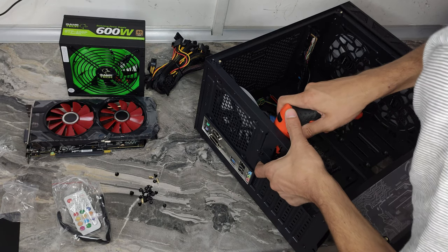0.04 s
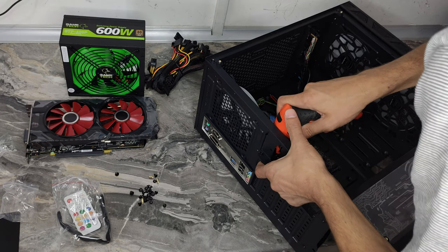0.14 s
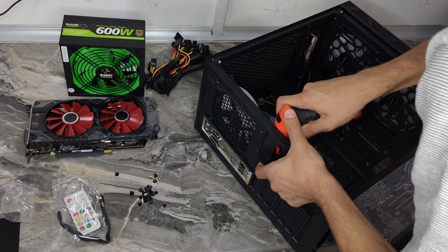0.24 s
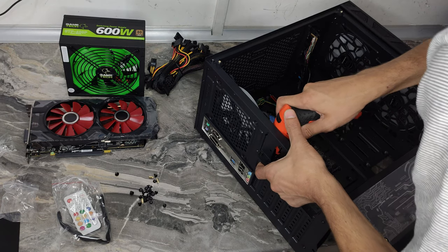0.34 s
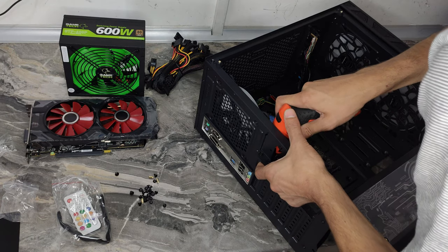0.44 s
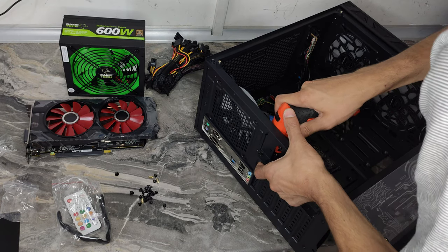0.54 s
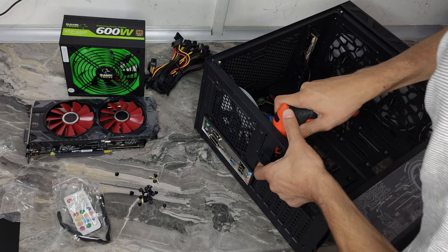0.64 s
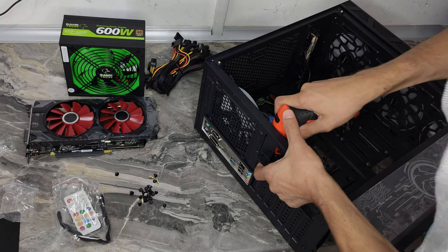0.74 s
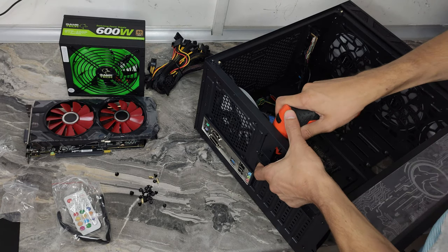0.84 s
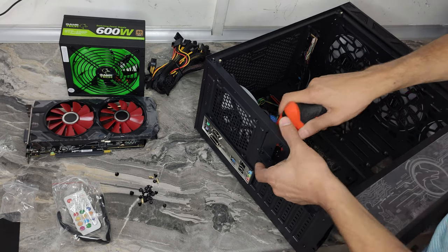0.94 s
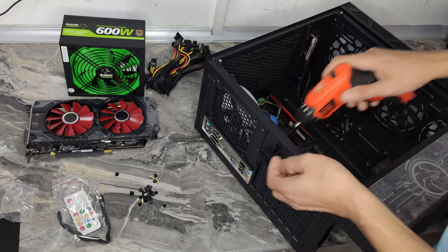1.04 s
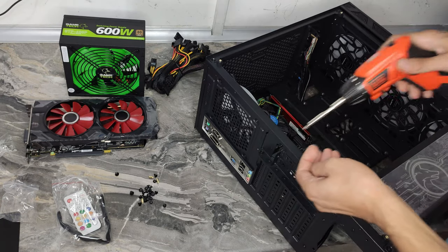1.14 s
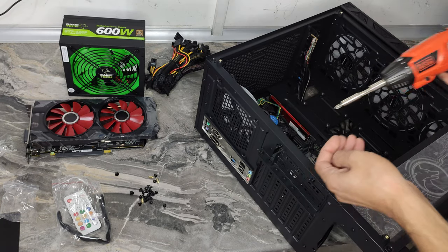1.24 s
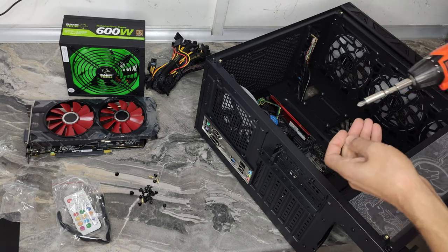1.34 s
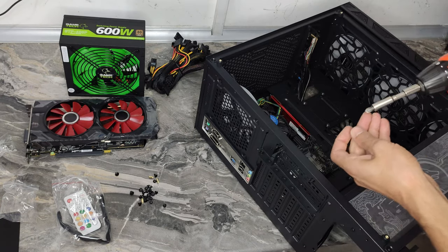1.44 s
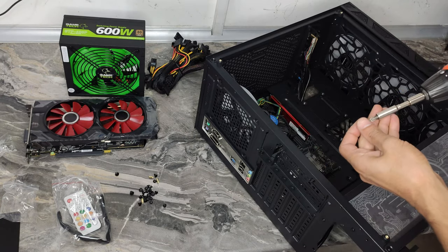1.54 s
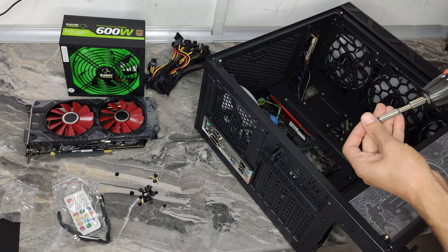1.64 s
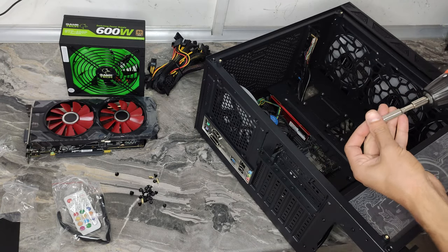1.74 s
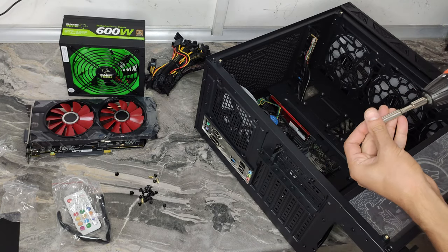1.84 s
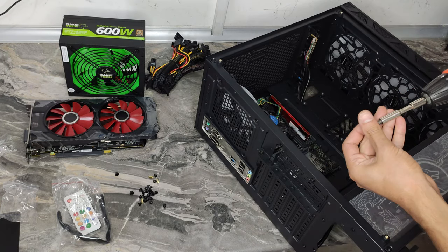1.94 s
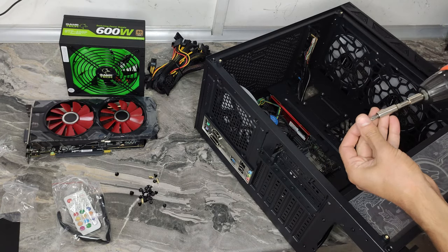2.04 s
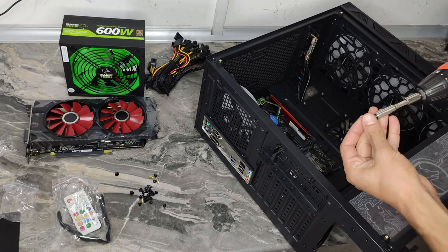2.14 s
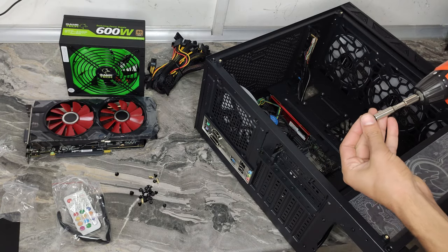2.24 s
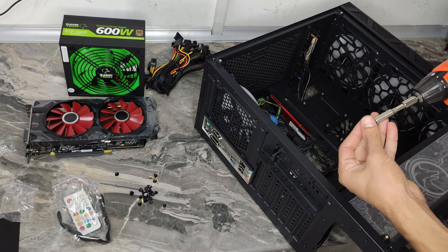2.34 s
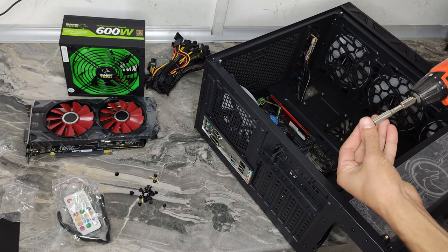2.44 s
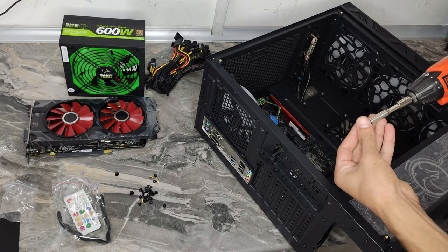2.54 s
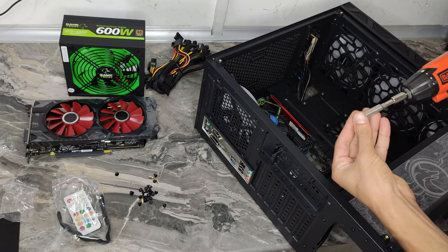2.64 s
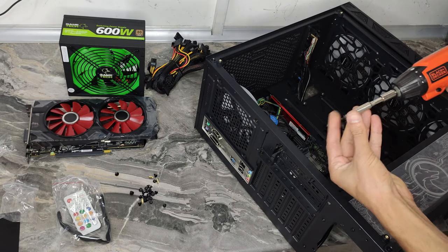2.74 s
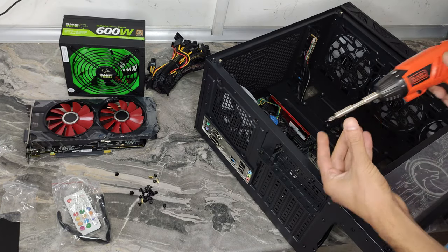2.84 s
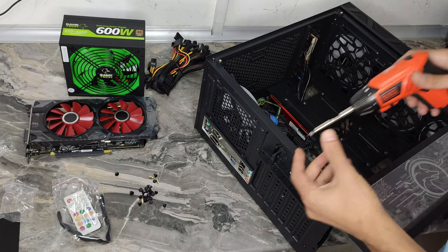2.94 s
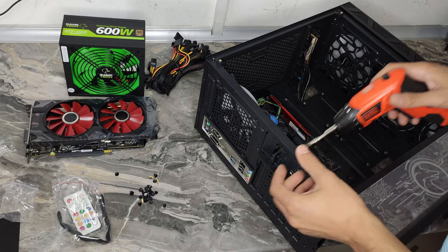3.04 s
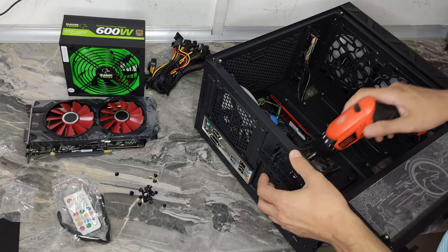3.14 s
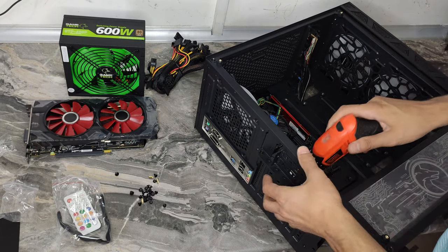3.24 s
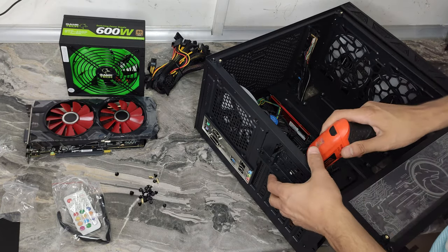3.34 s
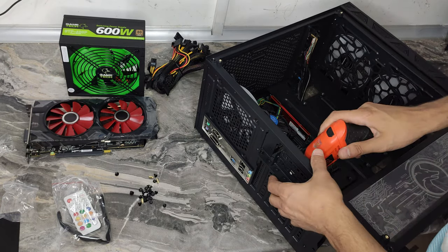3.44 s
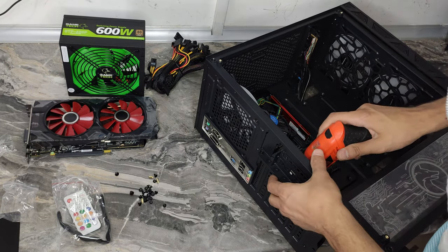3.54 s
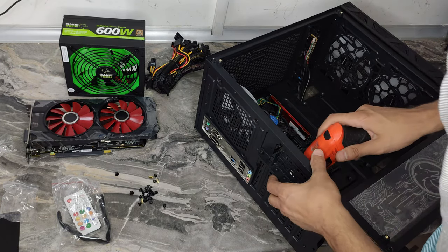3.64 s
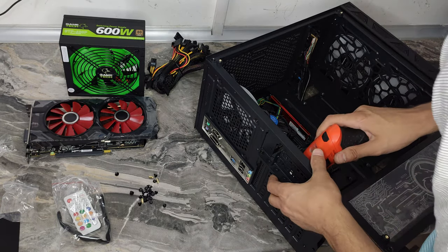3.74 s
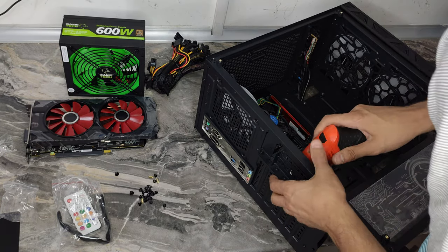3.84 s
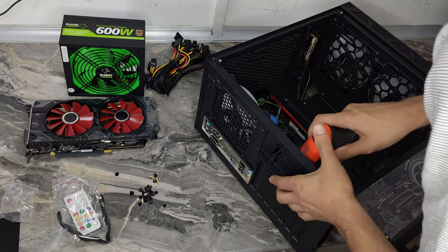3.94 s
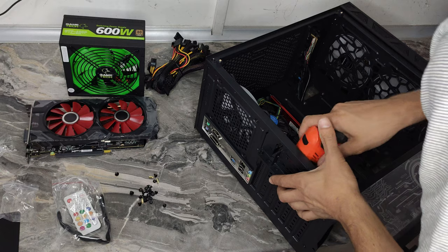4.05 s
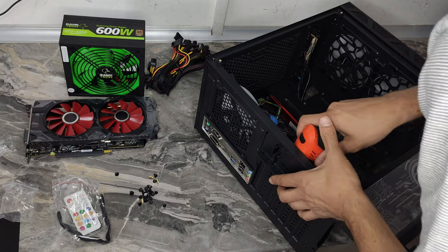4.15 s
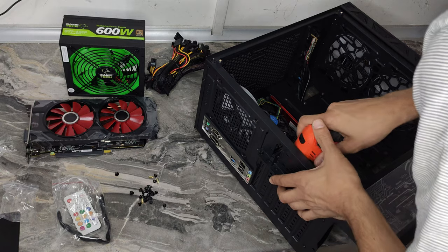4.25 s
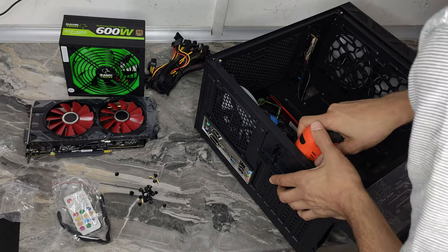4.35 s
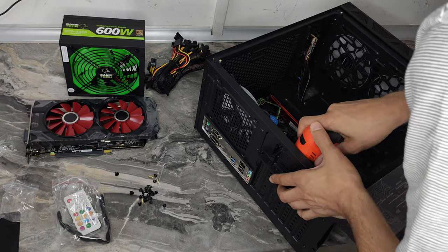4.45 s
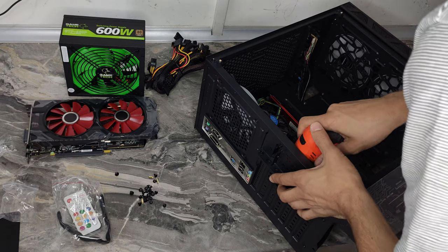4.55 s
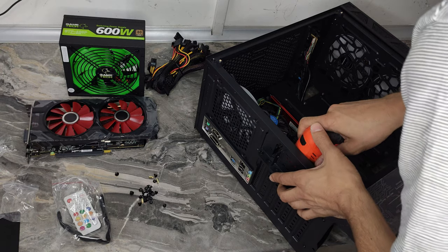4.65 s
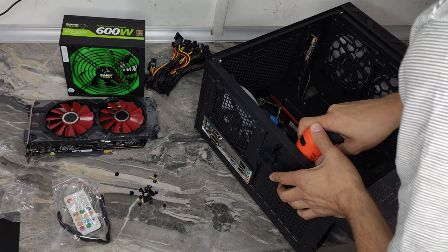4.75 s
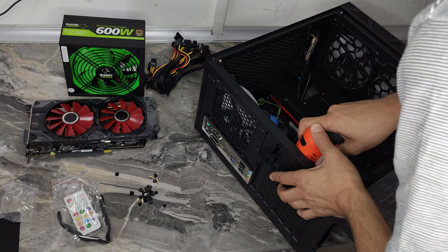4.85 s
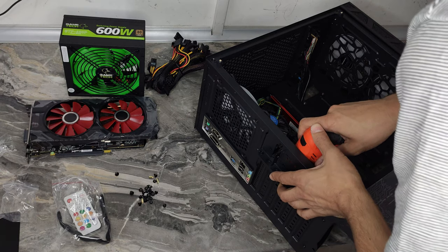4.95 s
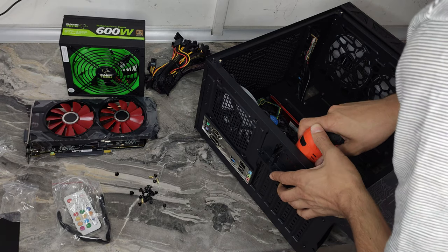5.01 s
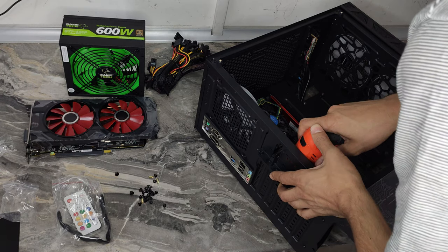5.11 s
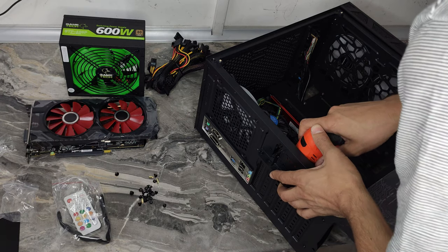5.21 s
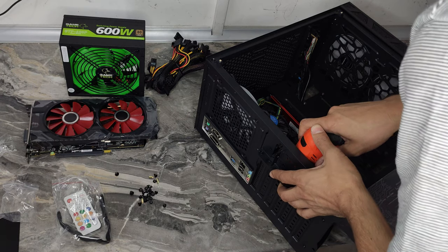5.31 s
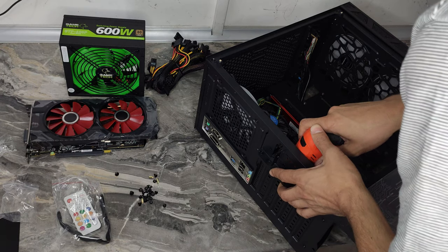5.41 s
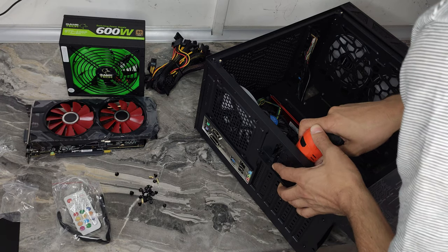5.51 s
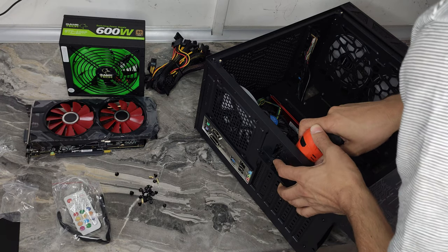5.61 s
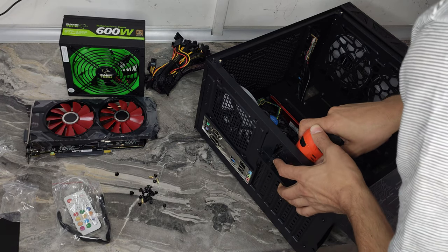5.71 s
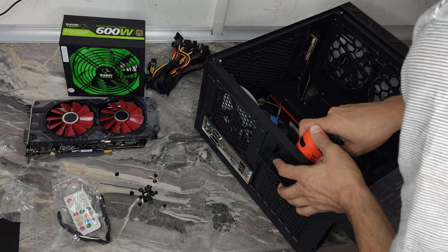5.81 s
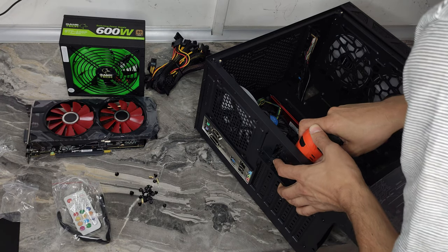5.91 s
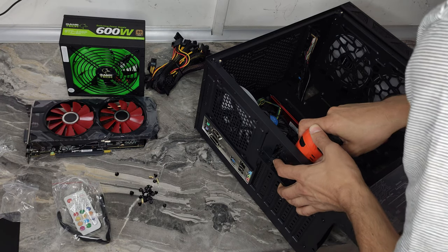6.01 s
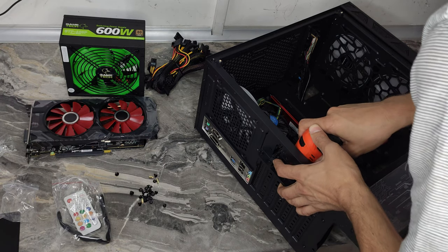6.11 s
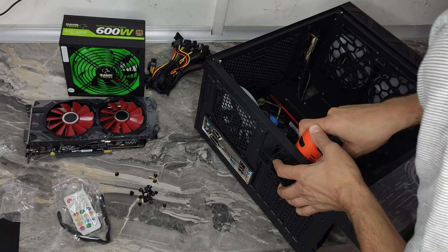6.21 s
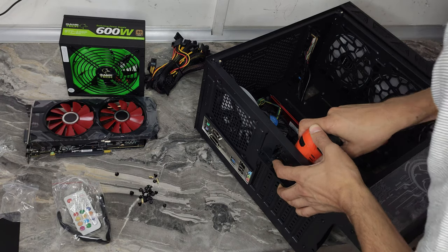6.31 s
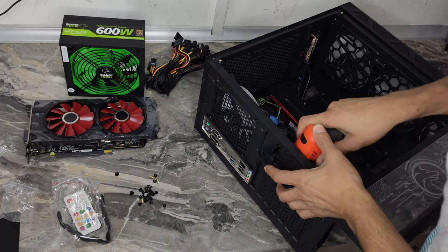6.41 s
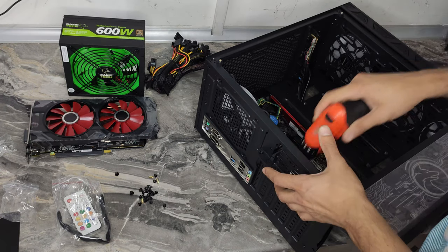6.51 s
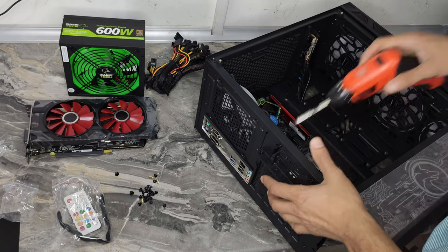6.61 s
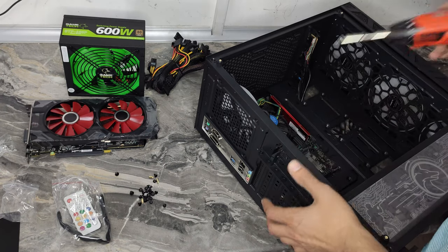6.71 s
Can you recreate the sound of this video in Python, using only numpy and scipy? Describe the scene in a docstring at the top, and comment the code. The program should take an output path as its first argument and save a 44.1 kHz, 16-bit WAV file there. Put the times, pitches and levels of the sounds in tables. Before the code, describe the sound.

A small cordless screwdriver is already running, its gears rattling and whining as it drives a screw into a steel computer case. From about 0.4 seconds it slows and groans under load, and the clutch clacks five times. At 1 second it stops with a knock that booms in the panels, and the motor briefly runs down. Faint ticks follow until about 3 seconds, the later ones from a screw touching the bit, then comes a soft shift of the plastic grip. Around 3.7 seconds the screw taps lightly around its hole. At 4.2 seconds the bit catches with a sharp click and the driver whirs again, growing louder. Near 5.9 seconds its pitch sinks under strain, the clutch ratchets from 6.1 to 6.4, and it stops with a softer knock at 6.5 seconds. The room is bare and slightly echoing, with a faint steady hush.

```python
"""Cordless screwdriver on a steel computer case.

A small driver sets two screws in a bare, echoing room. Its gears rattle, whine and slow under load,
the clutch ratchets, and the spindle locks with a knock that booms in the case panels. In between come
faint ticks as the motor runs down, then the next screw ticks on the bit and is tapped into its hole."""
import sys
import numpy as np
from scipy import signal
from scipy.fft import rfft, irfft
from scipy.io import wavfile
from scipy.ndimage import uniform_filter1d

SR = 44100
rng = np.random.default_rng(int(sys.argv[2]) if len(sys.argv) > 2 else 0)


def to_wav(sig):
    """Store sig (one row per channel, or 1-D mono) as 16-bit WAV at the path in sys.argv[1].

    Samples outside -1..1 are clipped; the rate is SR.
    """
    pcm = np.clip(np.atleast_2d(sig), -1, 1) * 32767
    pcm = np.round(pcm).astype(np.int16)
    wavfile.write(sys.argv[1], SR, pcm.T)  # frames by channels


N = 298557
TIME = np.arange(N) / SR

# one run per screw (trigger on [s], head touches [s], trigger off [s], gear noise [dB],
# rise under load [dB], bass re gear noise [dB], bass change at full load [dB], run-down [s])
MOTOR_RUNS = [(-1.0, .40, .945, -21, 4.5, -1.8, -1.2, .42), (4.18, 5.915, 6.449, -21, 4.5, -1.4, -2.2, .31)]
# gear rattle spectrum (frequency [Hz], density [dB])
GEAR_COLOUR = [(59, -71), (100, -32), (201, -24), (238, -19.5), (438, -7.5), (519, -12.5), (668, -3.5),
               (998, -11.5), (1370, -4.5), (2100, -4), (2930, -3.6), (4660, -12), (7250, -16),
               (14500, -31.5), (15500, -43)]
# resonances of the tool pressed on the case (frequency [Hz], width [Hz], lift [dB])
HOUSING_PEAKS = [(310, 144, 4.5), (445, 30, 7), (705, 58, 1.5), (785, 33, 4.5), (882.6, 13, 7),
                 (923, 72, 8), (1033, 27, 7.5), (1108, 29, 5), (1370, 32, 2), (2500, 97, -3.5),
                 (3350, 400, 2), (4040, 420, 3), (6780, 1400, 4), (11000, 900, 1.5)]
# hum and gear whine, one list per run (frequency at free speed [Hz], level re gear noise [dB])
WHINE_PARTIALS = [
    [(445, -15), (662, -15), (856, -11), (1160, -12.5), (1384, -9.5), (1480, -13), (2213, -18),
     (2649, -10.5), (3305, -18), (3693, -18)],
    [(210, -22), (648, -13.5), (700, -16), (788, -19), (942, -18), (1133, -11), (1338, -11.5), (1508, -18),
     (1889, -17), (2266, -16), (2864, -14), (3063, -11), (3385, -21)],
]
# gear mesh groan, sinking as each head seats (time [s], pitch [Hz], level re gear noise [dB])
GROAN_CURVE = [(0, 2700, -14), (.3, 2680, -16), (.40, 2350, -16), (.45, 2020, -11), (.50, 1800, -9),
               (.55, 1700, -9), (.60, 1400, -14), (.67, 1800, -11), (.72, 1620, -13), (.78, 1780, -10),
               (.86, 1300, -12), (.95, 1400, -14), (4.2, 2900, -19), (5.88, 2850, -17), (5.94, 2600, -12),
               (5.99, 2250, -10.5), (6.03, 2130, -9), (6.065, 1880, -6.5), (6.10, 1650, -7),
               (6.13, 1480, -7), (6.16, 1300, -9), (6.25, 1230, -12), (6.45, 1300, -18)]
# lower drone under full load (time [s], pitch [Hz], level re gear noise [dB])
DRONE_CURVE = [(.4, 900, -35), (.5, 880, -15), (.60, 820, -15), (.65, 790, -7), (.70, 830, -10),
               (.76, 830, -6.5), (.83, 880, -15), (.95, 900, -16), (4.2, 900, -45), (5.9, 880, -35),
               (5.98, 900, -11), (6.09, 940, -9), (6.18, 980, -12), (6.23, 920, -7), (6.30, 950, -7.5),
               (6.36, 780, -11), (6.45, 740, -14)]
# clutch slipping one notch (time [s], level [dB], decay [s], case jolt [dB], gear falter [dB])
CLUTCH_NOTCHES = [(0.603, -10, .008, -2, -4), (.717, -9, 0.008, -2, -7), (.785, -4.5, 0.008, -12, 0),
                  (0.854, -6.5, 0.006, -34, -4), (.924, -5, 0.005, -32, -5), (6.1425, -2, 0.007, -12, 0),
                  (6.213, -6, .012, -16, -3), (6.276, -7, .014, -18, -2), (6.344, -8, 0.012, -20, -3),
                  (6.417, -5.5, 0.005, -21, -3)]
# bit snapping against the screw's slots (time [s], level [dB], decay [s])
BIT_SLIPS = [(.629, -10, .007), (.648, -11, .006), (6.030, -11, .003), (6.058, -8.5, .003),
             (6.128, -9, .011), (6.361, -7, .004)]
# clutch and bit clack spectrum (frequency [Hz], density [dB])
RATCHET_COLOUR = [(100, -36), (400, -12), (800, -3), (1300, -.5), (2500, 0), (3600, -5), (5000, -8.5),
                  (7200, -8), (8500, -17.5), (15000, -36)]
# spectrum of clutch jolts in the case (frequency [Hz], density [dB])
CASE_JOLT_COLOUR = [(50, -46), (130, -15), (250, -8), (380, 0.5), (520, -9.5), (750, 2.5), (1100, -14),
                    (1800, -12), (5000, -41)]
# motor brush spectrum (frequency [Hz], density [dB])
COAST_COLOUR = [(200, -18), (1200, 0.5), (3300, -3), (5000, -7), (7000, -4), (8200, -15.5), (15000, -26.5)]
# spindle locking (time [s], level [dB], decay [s])
SPINDLE_LOCKS = [(0.989, -1.5, 0.012), (1.001, -5, 0.014), (6.472, -8.5, 0.012), (6.481, -8, 0.016)]
# lock thud spectrum (frequency [Hz], density [dB])
LOCK_COLOUR = [(35, -38), (65, -19), (100, -24), (150, -8.5), (230, -5.5), (300, -7), (405, 4), (520, -7),
               (720, -6), (1000, -8.5), (1400, -19), (2500, -24), (5500, -66)]
# steel panel modes (frequency [Hz], level [dB], T60 [s])
PANEL_MODES = [(155, -1, 0.2), (257, -12, 0.5), (344.5, 2, 0.14), (523, -14, 0.45), (654, -12, 0.37),
               (746, 6, 0.12), (1015, -9, 0.36), (1143, -19, .8), (1310, -18, 0.53), (1360, -8, 0.36)]
# faint ticks as the motor runs down, then the screw ticking on the bit
# (time [s], level [dB], decay [s], cut-off [Hz])
LIGHT_TICKS = [(1.257, -37, .003, 12900), (1.279, -35, .003, 13000), (1.719, -35, .003, 7000),
               (1.726, -27, 0.0035, 6000), (1.902, -22.5, 0.0035, 1900), (2.239, -30.5, 0.004, 9000),
               (2.288, -20, 0.007, 8500), (2.8125, -20.5, 0.0045, 7000), (4.016, -35, 0.003, 13000)]
# tick spectrum (frequency [Hz], density [dB])
LIGHT_TICK_COLOUR = [(300, -30), (700, -2), (1000, 1), (1350, 1), (2000, -5.5), (3000, -11.5), (4500, -13),
                     (6800, -14.5), (9000, -26), (15000, -28)]
# metallic ring of the ticks (frequency [Hz], width [Hz], lift [dB])
TICK_PEAKS = [(1200, 200, 5), (1405, 60, 6), (1650, 70, 1), (1860, 70, 2), (2085, 70, 5), (2370, 140, 3),
              (3020, 100, 4), (3330, 220, 2)]
# plastic grip shifting (time [s], level [dB], decay [s])
GRIP_SHIFTS = [(2.938, -41, 0.014), (2.953, -26.5, .006)]
# grip spectrum (frequency [Hz], density [dB])
PLASTIC_COLOUR = [(100, -27), (300, -10), (420, -6), (505, 1), (620, -12), (1000, -21), (4000, -52),
                  (12000, -55)]
# screw tapping round its hole (time [s], level [dB], decay [s], cut-off [Hz])
RIM_TAPS = [(3.643, -28, 0.012, 14000), (3.650, -21, .008, 3000), (3.661, -16.5, 0.007, 3200),
            (3.690, -30, 0.012, 3000), (3.722, -24.5, 0.016, 14000), (3.749, -23, 0.013, 5000),
            (3.803, -25, 0.012, 4000), (3.824, -25.5, 0.016, 9000), (3.856, -33, .012, 7000)]
# tap spectrum (frequency [Hz], density [dB])
RIM_COLOUR = [(50, -31), (90, -14), (170, -11), (260, -14), (380, 4), (560, -11.5), (800, -3.5),
              (1000, -10.5), (1400, -9.5), (2000, -16.5), (2600, -15), (3300, -15.5), (5000, -25),
              (7500, -22), (15000, -52)]
# panel resonances round the hole (frequency [Hz], width [Hz], lift [dB])
HOLE_PEAKS = [(382, 60, -3), (673, 50, 5.5), (817, 50, 4.5), (1370, 140, 9.5), (1580, 90, 6)]
# bit jumping into the screw head (time [s], level [dB], decay [s])
BIT_CATCHES = [(4.105, -44, 0.048), (4.140, -23, 0.025), (4.150, -14.5, 0.025), (4.166, -3.5, 0.013),
               (4.178, -7.5, 0.018)]
# catch spectrum (frequency [Hz], density [dB])
BIT_COLOUR = [(47, -45), (80, -20), (234, -21), (363, -10), (526, -11), (1040, -2.5), (1290, -16),
              (1380, -2.5), (1470, -21), (1570, -13), (3240, -14.5), (8300, -26.5), (15000, -51)]
# ring of the bit and the panel under it (frequency [Hz], width [Hz], lift [dB])
BIT_PEAKS = [(855, 23, 5.5), (940, 25, -10), (1032, 32, 4), (1210, 25, 6), (1540, 28, 13), (1860, 40, 7),
             (8100, 120, -1)]
# room hush spectrum (frequency [Hz], density [dB])
HUSH_COLOUR = [(12, -26), (20, 0), (38, -6), (59, -12), (157, -22), (180, -14.5), (259, -12), (352, -12),
               (393, -10), (505, -13), (958, -14.5), (1130, -19.5), (1980, -22.5), (6540, -32.5),
               (15500, -37.5)]
# room decay (frequency [Hz], T60 [s])
ROOM_DECAY = [(100, 0.71), (400, 0.37), (1000, 0.49), (3000, 0.48), (7000, 0.41), (15000, 0.17)]
# diffuse field (frequency [Hz], left-right correlation [-1..1])
STEREO_CORRELATION = [(50, 0.95), (300, 0.79), (700, 0.54), (1300, -0.049), (2600, 0.22), (5000, -0.12),
                      (14000, -0.1)]

FREE_TURNS_PER_S, GEAR_RATIO = 377, 79
SEAT_S, LET_GO_S = .27, .03   # head seating, drive dropping out


def from_db(db):
    """Decibels to gain."""
    return 10 ** (np.asarray(db) / 20)


def rms_one(x):
    """Scale to unit rms."""
    return x / np.sqrt(np.mean(x ** 2) + 1e-20)


def at_hz(points, hz):
    """Read a table on a log-frequency axis."""
    f, value = np.transpose(points)
    return np.interp(np.log(hz + 1), np.log(f), value)


def ramp(start_s, length_s):
    """Linear rise from 0 to 1."""
    return np.clip((TIME - start_s) / length_s, 0, 1)


def since(s):
    """Seconds since a moment, 0 before it."""
    return np.maximum(TIME - s, 0)


def drift(rate_hz):
    """Random wander of unit rms."""
    knots = rng.standard_normal(4096)
    return rms_one(np.interp(TIME * rate_hz, np.arange(len(knots)), knots))


def low_pass(x, hz):
    """Second-order Butterworth low-pass."""
    return signal.sosfilt(signal.butter(2, min(hz, .45 * SR), fs=SR, output="sos"), x + 1e-18)


def body(x, colour, peaks=(), size=8192):
    """Minimum-phase filter of unit power: broad colour plus resonances."""
    hz = np.arange(size // 2 + 1) * SR / size
    db = at_hz(colour, hz) + sum(lift / (1 + (2 * (hz - f) / width) ** 2) for f, width, lift in peaks)
    cepstrum = irfft(np.log(from_db(db)))
    cepstrum[1:size // 2] *= 2
    cepstrum[size // 2 + 1:] = 0
    response = irfft(np.exp(rfft(cepstrum)))
    return signal.fftconvolve(x, response / np.linalg.norm(response))[:N]


def chatter(contacts, grain_db, rise_s=.00044):
    """Each contact is a burst of tiny impacts: fast rise, exponential decay."""
    out, t = np.zeros(N), np.arange(SR // 8) / SR
    for s, db, decay_s, *_ in contacts:
        impacts = rms_one(rng.standard_normal(len(t)) * from_db(grain_db * rng.standard_normal(len(t))))
        envelope = from_db(db) * np.exp(-t / decay_s) * (1 - np.exp(-t / rise_s))
        start = round(s * SR)
        out[start:start + len(t)] += (impacts * envelope)[:N - start]
    return out


def rotor_speed(spin_up_s=.03, sag_share=.34):
    """Turns per second: quick spin-up, sag as the head seats, linear run-down."""
    share = 0
    for start, touch, stop, *_, run_down_s in MOTOR_RUNS:
        spin_up = 1 - np.exp(-since(start) / spin_up_s)
        share += spin_up * (1 - sag_share * ramp(touch, SEAT_S)) * (1 - ramp(stop, run_down_s))
    return FREE_TURNS_PER_S * share


def screw_load(ease_per_s=1.1):
    """Torque, 0-1: builds as the head seats, eases as the clutch gives, ends when the rotor halts."""
    load = 0
    for _, touch, stop, *_, run_down_s in MOTOR_RUNS:
        torque = np.clip(ramp(touch, SEAT_S) - ease_per_s * since(touch + SEAT_S), 0, 1)
        load += torque * (TIME < stop + run_down_s)
    return load


def effort(start, touch, stop, strain_db, loose_db=-11, bite_s=1.134, wobble_db=.5, swell_at_s=.044):
    """Gear gain over a run: rises as the thread bites and the head seats; the bit runs out of true."""
    loose = (1 - ramp(start, bite_s)) ** 2
    wobble = np.cos(2 * np.pi * (TIME - swell_at_s) * FREE_TURNS_PER_S / GEAR_RATIO)
    db = loose_db * loose + wobble_db * wobble + strain_db * ramp(touch, .31 * SEAT_S)
    return from_db(db) * ramp(start, length_s=.022) * (1 - ramp(stop, LET_GO_S))


def tooth_impacts(turns, uneven_db, teeth=9):
    """Pinion teeth strike in turn, each with its own weight plus a random part from backlash."""
    tooth = np.floor(turns * teeth).astype(int)
    weight_db = 1.3 * rng.standard_normal(teeth)[tooth % teeth] + uneven_db * rng.standard_normal(N)
    polarity = np.sign(rng.standard_normal(N) + .2)
    return rms_one(np.diff(tooth, prepend=0) * from_db(weight_db) * polarity)


def gear_rattle(turns, rub_db=-4, backlash_db=1.3):
    """Tooth impacts and sliding friction ring the housing; returns bass, middle, treble."""
    rub = from_db(rub_db) * rng.standard_normal(N)
    backlash = from_db(backlash_db * drift(190))
    force = backlash * rms_one(tooth_impacts(turns, uneven_db=3) + rub)
    rattle = body(force, GEAR_COLOUR, HOUSING_PEAKS)
    bass = signal.sosfiltfilt(signal.butter(2, 620, fs=SR, output="sos"), rattle)
    treble = signal.sosfiltfilt(signal.butter(2, 4300, "high", fs=SR, output="sos"), rattle)
    return bass, rattle - bass - treble, treble


def whine(partials, turns, speed, flutter_db=3, waver_rad=.8):
    """Rotor and gear tones: follow the speed, waver singly, fade as the rotor slows."""
    rad_per_hz = 2 * np.pi * turns / FREE_TURNS_PER_S
    tones = sum(from_db(db + flutter_db * drift(11)) * np.sin(hz * rad_per_hz + waver_rad * drift(45))
                for hz, db in partials)
    return (speed / FREE_TURNS_PER_S) ** 2 * tones


def groan(curve, waver_share, flutter_db=4):
    """Gear mesh under strain: a rough gliding tone, shaking in pitch and level."""
    s, hz, db = np.transpose(curve)
    phase = 2 * np.pi * np.cumsum(np.interp(TIME, s, hz) * (1 + waver_share * drift(260))) / SR
    return from_db(np.interp(TIME, s, db)) * rms_one(from_db(flutter_db * drift(170)) * np.sin(phase))


def motor(turns, speed, load, treble_db=2.8, load_treble_db=1.3):
    """Geared drive: rattle that brightens under load, and mesh tones; returned apart."""
    bass, middle, treble = gear_rattle(turns)
    relief = unloading()
    strain = (groan(GROAN_CURVE, waver_share=.05) + groan(DRONE_CURVE, waver_share=.075)) * relief ** .5
    upper = middle + from_db(treble_db + load_treble_db * load) * treble
    gears, tones = 0, 0
    for run, partials in zip(MOTOR_RUNS, WHINE_PARTIALS):
        start, touch, stop, db, strain_db, bass_db, load_bass_db, _ = run
        level = from_db(db) * effort(start, touch, stop, strain_db)
        gears += level * (upper + from_db(bass_db + load_bass_db * load) * bass)
        tones += level * (whine(partials, turns, speed) + strain)
    return gears * relief, tones


def unloading(dip_db=-2, lag_s=.02, slip_s=.05, lead_s=.023, falter_s=.018):
    """Gear gain: falters as the clutch climbs each notch, dips while it slips."""
    slipping = np.max([np.exp(-((TIME - s - lag_s) / slip_s) ** 2) for s, *_ in CLUTCH_NOTCHES], axis=0)
    falter_db = sum(db * np.exp(-((TIME - s + lead_s) / falter_s) ** 2) for s, *_, db in CLUTCH_NOTCHES)
    return from_db(dip_db * slipping + falter_db)


def ratchet(gain_db=.8):
    """The clutch clacks over its notches; the bit snaps against the screw's slots."""
    clacks = chatter(CLUTCH_NOTCHES + BIT_SLIPS, grain_db=2.5, rise_s=.001)
    return from_db(gain_db) * body(clacks, RATCHET_COLOUR)


def clutch_jolts(gain_db=-1):
    """Each notch raps the case through the bit."""
    jolts = [(s, jolt_db, decay_s) for s, _, decay_s, jolt_db, _ in CLUTCH_NOTCHES]
    return from_db(gain_db) * body(chatter(jolts, grain_db=1.5), CASE_JOLT_COLOUR)


def coasting(turns, start_db=-30.8, fall_db_per_s=38, halt_s=.12):
    """Brushes whisper on the commutator as the rotor runs down."""
    level = 0
    for _, _, stop, *_, run_down_s in MOTOR_RUNS:
        gate = ramp(stop - LET_GO_S, LET_GO_S) * (1 - ramp(stop + run_down_s - halt_s, halt_s))
        level += gate * from_db(start_db - fall_db_per_s * since(stop))
    return level * body(tooth_impacts(turns, uneven_db=2) + .34 * rng.standard_normal(N), COAST_COLOUR)


def case_boom(blows, spread_db=1.9):
    """Each blow rings every panel mode with its own strength."""
    out, at = np.zeros(N), [round(s * SR) for s, *_ in blows]
    for hz, mode_db, t60_s in PANEL_MODES:
        clicks = np.zeros(N) + 1e-18
        clicks[at] = from_db(np.array(blows)[:, 1] + mode_db + rng.normal(0, spread_db, len(at)))
        r, w = from_db(-60 / (t60_s * SR)), 2 * np.pi * hz / SR   # pole radius, angle
        out += rng.choice([-1, 1]) * signal.lfilter([0, np.sin(w)], [1, -2 * r * np.cos(w), r * r], clicks)
    return out


def spindle_lock(boom_db=-24):
    """The spindle locks with a thud that sets the panels booming."""
    thud = low_pass(body(chatter(SPINDLE_LOCKS, grain_db=1.5), LOCK_COLOUR), hz=1700)
    return thud + from_db(boom_db) * case_boom(SPINDLE_LOCKS)


def light_ticks(gain_db=-2.8):
    """Faint ticks as the motor runs down, then the screw ticking on the bit."""
    ticks = sum(low_pass(chatter([row], grain_db=3, rise_s=.0007), hz=row[-1]) for row in LIGHT_TICKS)
    return from_db(gain_db) * body(ticks, LIGHT_TICK_COLOUR, TICK_PEAKS)


def grip_shift():
    """The plastic grip shifts in the hand."""
    return body(chatter(GRIP_SHIFTS, grain_db=3, rise_s=.0015), PLASTIC_COLOUR)


def rim_taps(gain_db=.7):
    """The screw taps round the rim of its hole and drops in."""
    taps = sum(low_pass(chatter([row], grain_db=5.5, rise_s=.0019), hz=row[-1]) for row in RIM_TAPS)
    return from_db(gain_db) * body(taps, RIM_COLOUR, HOLE_PEAKS)


def bit_catch(gain_db=.7):
    """The bit jumps into the screw head as the motor starts."""
    return from_db(gain_db) * body(chatter(BIT_CATCHES, grain_db=1.5, rise_s=.00098), BIT_COLOUR, BIT_PEAKS)


def diffuse(size):
    """Stereo noise from all around: alike in the bass, unrelated in the treble."""
    mid, side = rfft(rng.standard_normal((2, size)))
    alike = np.clip(at_hz(STEREO_CORRELATION, np.arange(len(mid)) * SR / size), -1, 1)
    return irfft(np.sqrt(1 + alike) * mid + np.sqrt(1 - alike) * side * [[1], [-1]], size)


def room_response(early_s=.0048, size=32768):
    """Quick reflections in the case, then the room's tail, dying band by band."""
    t, hz = np.arange(size) / SR, np.arange(size // 2 + 1) * SR / size
    noise, centres_hz = rfft(diffuse(size)), np.geomspace(100, 15000, 8)
    tail = 0
    for centre, share in zip(centres_hz, np.eye(len(centres_hz))):
        band = irfft(noise * at_hz(np.c_[centres_hz, share], hz))
        tail += band * from_db(-60 * t / at_hz(ROOM_DECAY, centre))
    tail *= 1 + np.exp(-t / early_s)
    return rms_one(tail) / np.sqrt(size)


def in_room(x, room, direct_db):
    """Direct sound plus reflections, equalised to add no broad colour."""
    paths = rfft(room) + from_db(direct_db)
    paths /= np.sqrt(uniform_filter1d(np.mean(abs(paths) ** 2, axis=0), size=56))
    response = irfft(paths)[:, :room.shape[1] * 3 // 4]
    lead = SR // 4   # the room already rings at the start
    padded = np.pad(x, (lead, 0), "reflect")
    return signal.fftconvolve(padded[None], response, axes=1)[:, lead:lead + N]


def swaying(x, room_a, room_b, open_db=-4.8, shaded_db=-25):
    """Hands move over the tool: its sound shifts between an open and a shaded path."""
    angle = drift(4) + np.pi / 4
    return in_room(x * np.cos(angle), room_a, open_db) + in_room(x * np.sin(angle), room_b, shaded_db)


def scene(hush_db=-51):
    """Tool, case and small parts on two sets of paths through one room, over its steady hush."""
    room_a, room_b = room_response(), room_response()
    speed = rotor_speed() * (1 + .0055 * drift(25))
    turns = np.cumsum(speed) / SR
    gears, tones = motor(turns, speed, screw_load())
    tool = swaying(gears + coasting(turns), room_a, room_b) + in_room(tones, room_a, direct_db=1.5)
    clutch = in_room(ratchet(), room_b, direct_db=-.5)
    catch = in_room(bit_catch(), room_a, direct_db=-1)
    knocks = in_room(clutch_jolts() + spindle_lock(), room_a, direct_db=3.5)
    handling = in_room(grip_shift() + rim_taps(), room_b, direct_db=-3)
    ticks = in_room(light_ticks(), room_b, direct_db=-2.5)
    hush = from_db(hush_db) * np.array([body(side, HUSH_COLOUR) for side in diffuse(N)])
    return tool + clutch + catch + knocks + handling + ticks + hush


def record(dry, cutoff_hz=15600):
    """Soft clip, then a steep low-pass."""
    rounded = dry / (1 + dry ** 8) ** (1 / 8)
    return signal.sosfilt(signal.ellip(10, .1, 80, cutoff_hz, fs=SR, output="sos"), rounded)


dry = scene()
out = record(dry)
to_wav(out)
```